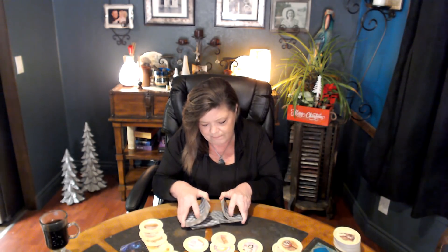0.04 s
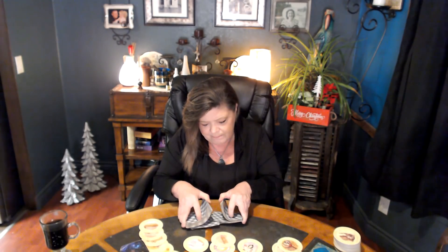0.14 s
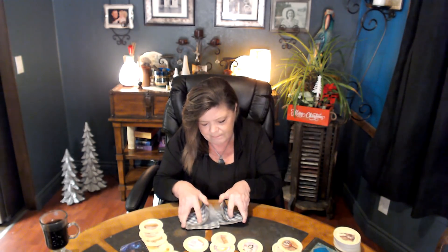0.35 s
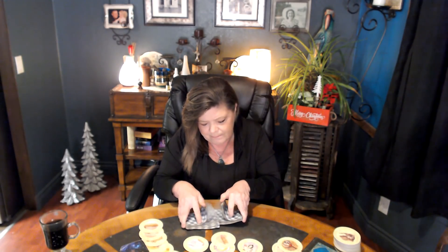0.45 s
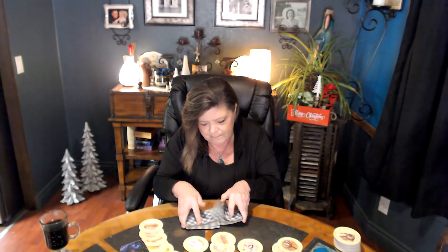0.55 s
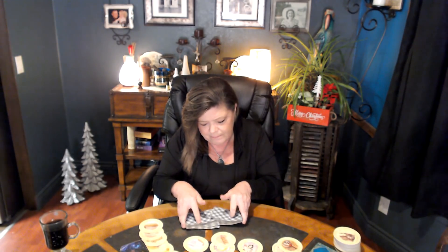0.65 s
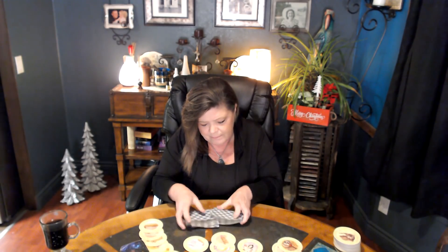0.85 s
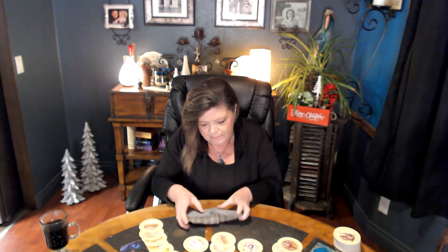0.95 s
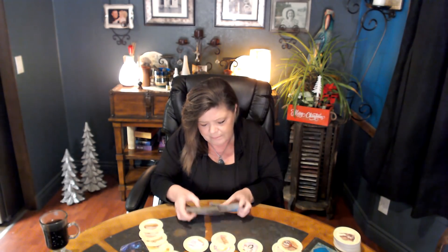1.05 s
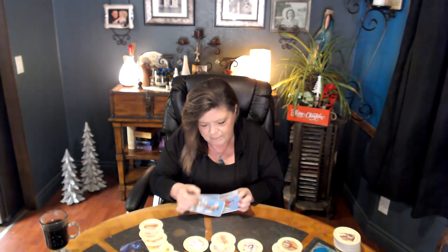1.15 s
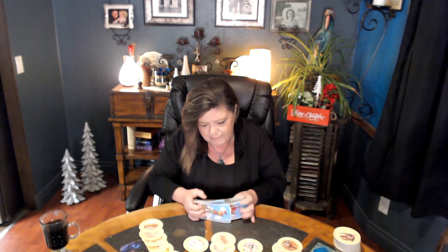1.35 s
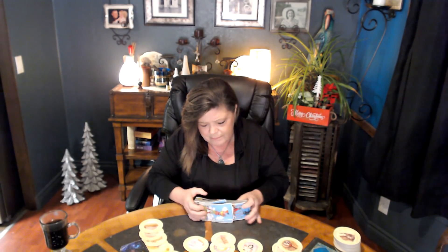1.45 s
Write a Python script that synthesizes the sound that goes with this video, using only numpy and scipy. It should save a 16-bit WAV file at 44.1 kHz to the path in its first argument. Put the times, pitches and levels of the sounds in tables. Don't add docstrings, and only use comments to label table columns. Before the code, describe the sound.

Playing cards riffle together in a fast snapping burst, followed by faint finger rustles and light knocks

```python
import sys
import numpy as np
from scipy import signal
from scipy.io import wavfile
from scipy.ndimage import uniform_filter1d

SR = 44100
rng = np.random.default_rng(int(sys.argv[2]) if len(sys.argv) > 2 else 0)


def volts_from_decibels(level):
    exponent = np.asarray(level, float) / 20
    return 10 ** exponent


def wav_record(signal):
    frames = np.transpose(np.atleast_2d(signal))
    bounded = np.clip(frames, -1, 1)
    quanta = np.round(bounded * 32767).astype(np.int16)
    wavfile.write(sys.argv[1], SR, quanta)


N = 66150

# start_s [s], peak_db [dB], resonance_hz [Hz]
CARD_SLAPS = [(0.1835, -28.5, 4100), (0.2017, -27.0, 4200), (0.2076, -30, 2280), (0.2207, -27, 3126),
              (0.2259, -27.5, 2880), (0.2302, -30.5, 2860), (0.2358, -27, 2730), (0.2404, -14, 2530),
              (0.2475, -27.5, 2090), (0.2565, -26.0, 1900), (0.2618, -19, 1970), (0.2667, -22, 1860),
              (0.2774, -29.0, 1850), (0.2872, -31.5, 2110), (0.2916, -31.5, 2630), (0.3144, -18, 3140),
              (0.3202, -24, 2790), (0.3375, -16, 4170), (0.3431, -15.5, 3850), (0.3509, -23, 3220),
              (0.3622, -21.5, 3550), (0.3693, -11, 4400), (0.3745, -23.5, 3260), (0.3792, -9.5, 3370),
              (0.386, -19.5, 3147), (0.3948, -20, 3440), (0.4036, -23, 3880), (0.4129, -14.5, 2110),
              (0.4192, -18, 3230), (0.4311, -15.5, 4430), (0.4351, -20.5, 2600), (0.4467, -28.5, 2844),
              (0.4544, -26, 2230), (0.4615, -23.5, 4000), (0.4687, -24.5, 3570), (0.477, -3, 3770),
              (0.482, -14.0, 2900), (0.4865, -8, 3746), (0.4926, -15, 2880), (0.4984, -15, 2950),
              (0.5023, -14.5, 3260), (0.5116, -6.5, 1424), (0.5159, -11.5, 2770), (0.5195, -15, 2570),
              (0.527, -17, 5300), (0.5361, -15.5, 1650), (0.5437, -25, 2613), (0.5517, -23.5, 3240),
              (0.5565, -24, 2340), (0.5623, -14, 2920), (0.5657, -19, 1260), (0.5831, -10.0, 2200),
              (0.5892, -12.5, 1260), (0.6024, -29, 1870), (0.6175, -22.5, 2395), (0.6245, -37, 1840),
              (0.6302, -21.5, 1710), (0.6582, -32, 1900)]
# start_s [s], peak_db [dB], resonance_hz [Hz]
CARD_FLOPS = [(.3293, -27.5, 715), (.3492, -18, 600), (.4058, -17.5, 746), (.4195, -21, 700),
              (.4418, -30.5, 600), (.4468, -22.5, 689), (.4605, -25.5, 600), (.4685, -21.5, 604),
              (.5235, -18, 897), (.5715, -28, 700), (.5122, -14.5, 795), (.5835, -22, 681),
              (.593, -16.5, 624), (.601, -20.5, 513), (.6098, -20.5, 850), (.6172, -22, 592),
              (.6285, -25.5, 599)]
# start_s [s], peak_db [dB], centre_hz [Hz]
EDGE_TICKS = [(.1838, -40, 8990), (.2011, -39, 8000), (.2177, -27.5, 11000), (.229, -28, 10000),
              (.2395, -24, 12000), (.2608, -36, 11030), (.2735, -44, 11000), (.286, -40.5, 11000),
              (.2903, -34, 10000), (.314, -27, 8200), (.3373, -8, 9170), (.3693, -13, 9000),
              (.3744, -21.5, 10020), (.391, -19.5, 10100), (.4132, -20.5, 11400), (.4193, -17, 9000),
              (.4308, -14, 10000), (.4688, -24.5, 10000), (.4863, -14.5, 9000), (.4922, -21.5, 11500),
              (.5012, -26, 8200), (.5127, -18, 8100), (.5833, -19, 7000), (.2295, -30, 4940),
              (.2405, -26.5, 5000), (.5271, -9, 9000), (.537, -25.5, 8000), (.566, -25.5, 9000),
              (.5942, -23, 10500), (.6105, -27, 10000), (.6165, -20.5, 8930)]
# start_s [s], level_db [dB], bent_deck_hz [Hz], fade_s [s], table_thud_db [dB]
CARD_PACKETS = [(0.181, -45.5, 2760, 0.053, -4), (0.2008, -36.5, 2000, 0.066, -9.5),
                (0.229, -34.5, 1830, 0.014, -26.5), (0.243, -38.5, 2000, 0.026, -20),
                (0.314, -28, 2190, 0.0085, -14.5), (0.339, -25.5, 2510, 0.019, -10.5),
                (.369, -20.5, 2690, 0.0091, -10), (0.383, -30, 2590, 0.064, -6),
                (0.427, -33.5, 2000, 0.13, -4.5), (0.479, -22.5, 2680, 0.042, -11.5),
                (0.511, -38.5, 2100, 0.084, -7), (0.56, -35.5, 1470, 0.01, -2.5),
                (0.583, -27.5, 1700, 0.019, -8), (0.615, -42.5, 1380, 0.01, 7)]
# start_s [s], peak_db [dB], scrape_s [s]
SQUARING_KNOCKS = [
    (1.2651, -29.5, 0.013),
    (1.3206, -27.5, 0.022),
    (1.472, -46.5, 0.022),
]
# mode_hz [Hz], level_db [dB], t60_s [s]
DECK_RINGS = [(707, -4.5, 0.035), (1257, -7, 0.06), (1452, -9, 0.06), (2000, 5.5, 0.011), (2275, 4, 0.004),
              (3760, 0, 0.002), (323, -12.5, 0.042)]
# mode_hz [Hz], level_db [dB], t60_s [s]
TABLE_RINGS = [(339, 6.5, 0.012), (259, -5.5, 0.0088), (1260, 4.5, 0.0098), (977, -10.5, 0.036),
               (1130, -9, 0.018), (2226, 2.5, 0.0057)]
# mode_hz [Hz], level_db [dB], t60_s [s]
LAST_RINGS = [(1027, 2, 0.019), (1262, 5.5, 0.0085), (3590, -6.5, 0.0029), (1700, -5.5, 0.014)]
MODE_LAGS = (3.0, 0.13, 0.17)
# start_s [s], peak_db [dB], mode_hz [Hz], t60_s [s]
TABLE_THUMPS = [
    (0.183, -55, 193, 0.041),
    (.345, -45.5, 211, .06),
    (0.371, -45.5, 234, 0.044),
    (0.437, -44, 166.5, 0.17),
    (0.511, -34.5, 222, 0.099),
    (.535, -49, 134, .08),
    (.565, -42.5, 212, 0.072),
    (0.613, -48, 140.7, 0.15),
    (1.274, -55, 323, .05),
    (1.324, -44.5, 332, .07),
]
# start_s [s], peak_db [dB], centre_hz [Hz]
FINGER_TAPS = [
    (0.0293, -56.5, 6900),
    (0.8114, -44.5, 6810),
    (0.908, -50, 11400),
    (1.0087, -52, 6300),
    (1.1879, -52, 4670),
    (1.269, -50, 8630),
    (1.3235, -42.5, 6600),
]
# start_s [s], length_s [s], level_db [dB], centre_hz [Hz], width_octaves [octaves]
FINGER_SLIDES = [(.0, 0.05, -74.5, 4300, 0.74), (0.02, 0.062, -70, 1490, 0.57),
                 (0.32, .035, -75, 1500, 1.3), (1.4, 0.064, -76.5, 9900, 0.83),
                 (0.8, 0.43, -78.5, 6040, 0.5), (1.09, 0.14, -83, 4600, 1.46),
                 (0.747, 0.06, -77.5, 10600, 0.76), (0.81, 0.048, -74, 5990, 0.49),
                 (.82, 0.31, -75.5, 11400, 0.37), (0.884, 0.038, -73.5, 4250, 0.23),
                 (0.961, 0.07, -70, 990, 0.37), (1.06, 0.034, -75, 2400, 0.19),
                 (0.899, 0.062, -70, 2093, 0.35), (0.86, .05, -82.5, 6540, 0.5),
                 (1.073, 0.077, -67.5, 6800, 1.53), (1.092, 0.026, -65.5, 1610, 0.37),
                 (1.132, 0.13, -71.5, 10500, 0.6), (1.15, 0.063, -69, 6930, 1.2),
                 (1.187, .035, -67, 4600, 0.53), (1.262, 0.15, -64.5, 7860, 1),
                 (1.375, 0.11, -56.5, 1200, 0.43), (0.155, .03, -71.5, 4000, 1.7),
                 (0.079, 0.034, -79, 8000, 1.5), (0.746, 0.032, -60.5, 1675, 0.91)]
# band_hz [Hz], t60_s [s]
ROOM_DECAY = [(200, 0.25), (700, 0.23), (1800, 0.3), (4000, 0.3), (10000, 0.19)]
# band_hz [Hz], density_db [dB per Hz]
AIR_SPECTRUM = [(25, -6), (45, -23), (90, -37), (170, -17.5), (240, -5.5), (466, -6), (900, -15.5),
                (3000, -24.5), (9000, -41.5)]


def rms_one(x):
    return x / np.sqrt(np.mean(x ** 2) + 1e-20)


def at_hz(points, hz):
    table_hz, value = np.array(points).T
    return np.interp(np.log(hz), np.log(table_hz), value)


def band(x, low_hz, high_hz):
    edges_hz = [low_hz, min(high_hz, SR / 2.2)]
    return signal.sosfilt(signal.butter(2, edges_hz, "band", fs=SR, output="sos"), x)


def ring(x, hz, t60_s):
    r = volts_from_decibels(-60 / (t60_s * SR))
    w = 2 * np.pi * hz / SR
    return signal.lfilter([0, np.sin(w)], [1, -2 * r * np.cos(w), r * r], x + 1e-18)


def drift(rate_hz):
    r = np.exp(-2 * np.pi * rate_hz / SR)
    settled = signal.lfilter([1], [1, -2 * r, r * r], rng.standard_normal(N + SR))[SR:]
    return rms_one(settled)


def add(out, start_s, x, peak_db):
    i = int(start_s * SR)
    out[i:i + len(x)] += (volts_from_decibels(peak_db) * x / np.abs(x).max())[:N - i]


def slip_grains(rate_per_s, spread_db):
    size = volts_from_decibels(spread_db * np.minimum(rng.exponential(1, N), 4))
    sign = rng.choice([-1, 1], N)
    return size * sign * (rng.random(N) < rate_per_s / SR)


def slaps(table):
    out, t = np.zeros(N), np.arange(600) / SR
    ring_cycles, crack_db, trim_db = 2.8, -27, -1.5
    for start_s, peak_db, hz in table:
        noise = rng.standard_normal(len(t))
        push = np.exp(-t / 0.00008) + 0.26 * noise * np.exp(-t / 0.00089)
        t60_s = ring_cycles / hz
        modes = ring(push, hz, t60_s) + 0.17 * ring(push, 1.82 * hz, t60_s)
        body = band(modes, hz / 1.74, hz * 2.26)
        crack = volts_from_decibels(crack_db) * noise * np.exp(-t / 0.0015)
        add(out, start_s, body / np.abs(body).max() + crack, peak_db + trim_db)
    return out


def ticks(table):
    out, t = np.zeros(N), np.arange(400) / SR
    chatter_s, width, trim_db = 0.0016, 1.56, 3
    for start_s, peak_db, hz in table:
        chatter = rng.standard_normal(len(t)) * np.exp(-t / chatter_s)
        burst = 5.02 * (t == 0) + chatter
        add(out, start_s, band(burst, hz / width, hz * width), peak_db + trim_db)
    return out


def buzz():
    t, out = np.arange(N) / SR, 0
    slips_per_s, slip_spread_db, edge_db, riffle_end_s = 4000, 2, -15, 0.633
    width = 1 + 1 / 1.64
    slips = slip_grains(slips_per_s, slip_spread_db)
    edges = rms_one(band(slip_grains(slips_per_s, slip_spread_db), 4400, 8800))
    thuds = rms_one(band(band(slip_grains(900, 0.96), 322, 971), 322, 971))
    for start_s, level_db, hz, fade_s, thud_db in CARD_PACKETS:
        deck = band(slips, hz / width, hz * width)
        deck = rms_one(band(deck, hz / width ** 1.9, hz * width ** 1.5))
        shape = (t > start_s) * np.exp(-np.abs(t - start_s) / fade_s)
        out = out + volts_from_decibels(level_db) * shape * (deck + volts_from_decibels(edge_db) * edges + volts_from_decibels(thud_db) * thuds)
    return out * np.exp(-np.maximum(t - riffle_end_s, 0) / 0.0093)


def knocks():
    out, t = np.zeros(N), np.arange(8000) / SR
    scrape_db, scrape_rise_s = -16, 0.0016
    bodies, blows_db = (DECK_RINGS, TABLE_RINGS, LAST_RINGS), (-6, 9, 3)
    for (start_s, peak_db, scrape_s), modes, blow_db, lag in zip(SQUARING_KNOCKS, bodies, blows_db, MODE_LAGS):
        swell = np.exp(-t / scrape_s) * (1 - np.exp(-t / scrape_rise_s))
        scrape = volts_from_decibels(scrape_db) * rng.standard_normal(len(t)) * swell
        force = volts_from_decibels(blow_db) * (t == 0) + scrape
        sound = 0.071 * band(force, 1700, 4500)
        for hz, level_db, t60_s in modes:
            mode = band(ring(force, hz, t60_s), hz / 1.59, hz * 1.47)
            sound = sound + volts_from_decibels(level_db) * np.interp(t - lag / hz, t, mode, left=0)
        add(out, start_s, sound, peak_db)
    return out


def thumps():
    out, t = np.zeros(N), np.arange(6000) / SR
    push = t * np.exp(-t / 0.00052)
    for start_s, peak_db, hz, t60_s in TABLE_THUMPS:
        add(out, start_s, band(ring(push, hz, t60_s), hz / 1.21, hz * 1.5), peak_db)
    return out


def breeze(cards):
    rumble = rms_one(band(rng.standard_normal(N), 15, 70))
    return volts_from_decibels(-44.5) * uniform_filter1d(np.abs(cards), size=900) * rumble


def slides():
    t, out = np.arange(N) / SR, 0
    for start_s, length_s, level_db, hz, octaves in FINGER_SLIDES:
        progress = np.clip((t - start_s) / length_s, 0, 1)
        shape = np.abs(np.sin(np.pi * progress ** 0.46)) ** 0.5
        half_width = 2 ** (octaves / 2)
        noise = rms_one(band(rng.standard_normal(N), hz / half_width, hz * half_width))
        out = out + volts_from_decibels(level_db + 1.9 * drift(30)) * shape * noise
    return out


def room(x):
    t, tail = np.arange(SR // 2) / SR, 0
    room_db, build_up_s = -4.5, 0.005
    edges_hz = 100 * 2 ** np.arange(0, 8.1, 1)
    white = rng.standard_normal((2, len(t)))
    for k, (low, high) in enumerate(zip(edges_hz, edges_hz[1:])):
        decay = volts_from_decibels(-60 * t / at_hz(ROOM_DECAY, np.sqrt(low * high)))
        tail = tail + band(white[k % 2], low, high) * decay
    tail = tail * (1 - np.exp(-t / build_up_s))
    return signal.fftconvolve(x, volts_from_decibels(room_db) * tail / np.sqrt(np.sum(tail ** 2)))[:N]


def gate(x):
    threshold_db, depth_db, knee_db = -61.5, -18, 0.78
    level_db = 10 * np.log10(uniform_filter1d(x ** 2, size=660).clip(1e-14))
    return x * volts_from_decibels(depth_db / np.exp((level_db - threshold_db) / knee_db))


def room_air():
    out, white = 0, rng.standard_normal((2, N))
    edges_hz = 25 * 2 ** np.arange(0, 9.6, 0.5)
    for k, (low, high) in enumerate(zip(edges_hz, edges_hz[1:])):
        level_db = at_hz(AIR_SPECTRUM, np.sqrt(low * high)) - 1.0 * drift(16.0)
        out = out + volts_from_decibels(level_db) * band(white[k % 2], low, high)
    return volts_from_decibels(-65.5) * rms_one(out)


def hum():
    hz, width_hz, level_db = 138, 2, -69
    tone = np.sin(2 * np.pi * hz * np.arange(N) / SR)
    unsteady = rms_one(ring(rng.standard_normal(N), hz, 6.6 / width_hz))
    return volts_from_decibels(level_db) * rms_one(tone + 0.1 * unsteady)


def scene():
    cards = slaps(CARD_SLAPS) + slaps(CARD_FLOPS) + volts_from_decibels(-1.5) * buzz() + knocks()
    edges = ticks(EDGE_TICKS)
    heard = cards + edges + room(cards + volts_from_decibels(-1.5) * edges)
    close = signal.sosfilt(signal.butter(6, 160, "high", fs=SR, output="sos"), heard)
    close = signal.sosfilt(signal.butter(1, 13000, fs=SR, output="sos"), close)
    fingers = ticks(FINGER_TAPS) + slides()
    return (gate(close) + thumps() + breeze(close) + fingers + room_air() + hum())[None]


def band_limit(x):
    return signal.sosfilt(signal.butter(12, 17480, fs=SR, output="sos"), x)


def record(dry):
    mix = signal.sosfilt(signal.cheby2(10, 50, 16200, fs=SR, output="sos"), dry)
    return band_limit(mix)


dry = scene()
out = record(dry)
wav_record(out)
```